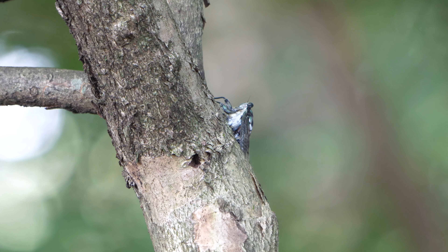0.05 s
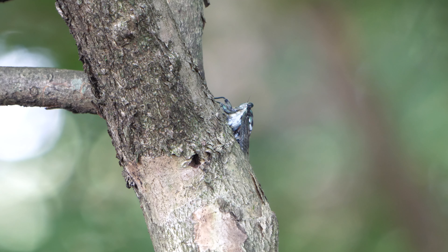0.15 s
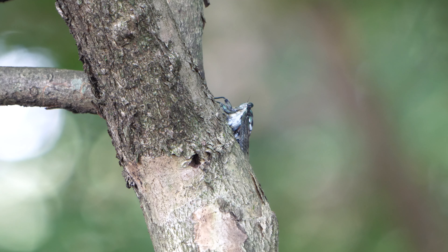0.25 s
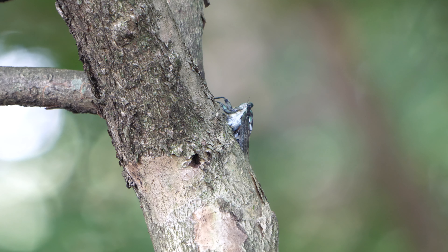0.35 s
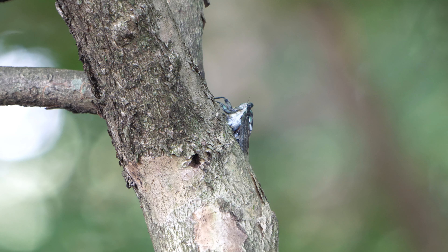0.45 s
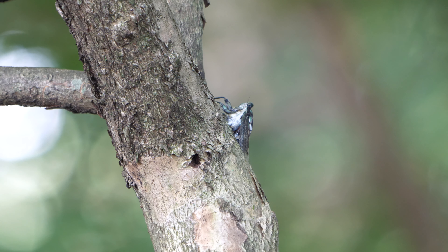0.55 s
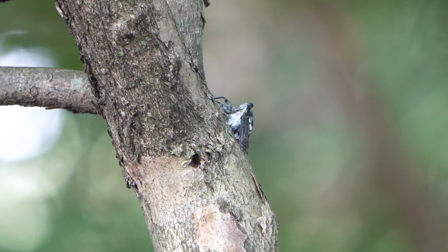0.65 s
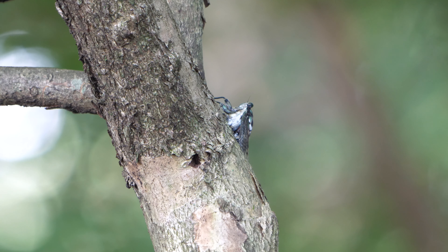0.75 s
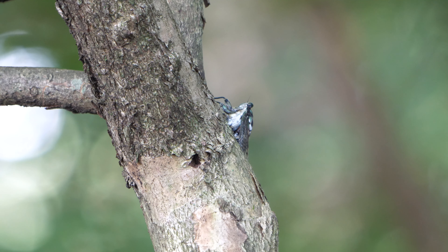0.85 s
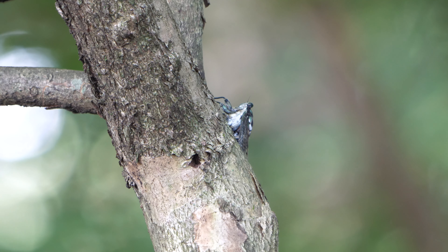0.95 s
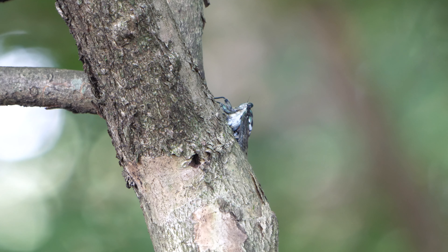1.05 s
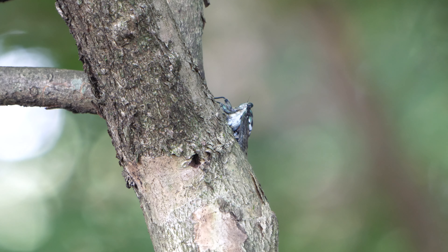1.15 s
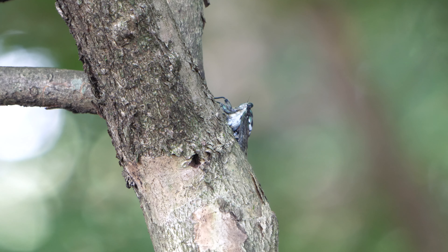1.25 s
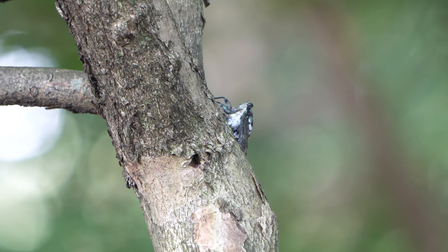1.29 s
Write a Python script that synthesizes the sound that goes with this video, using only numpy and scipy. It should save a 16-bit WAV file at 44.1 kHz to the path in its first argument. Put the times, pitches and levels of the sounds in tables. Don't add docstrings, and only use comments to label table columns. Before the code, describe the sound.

A steady wash of many distant cicadas surrounds the microphone, slightly uneven in loudness and brightness, with soft distant rumble beneath. A single near cicada enters at about two seconds: a coarse buzz climbing to a loud, tight note, dropping to thin dry clicking, then three brief whining pulses. Only the chorus remains until seven seconds, when the same buzz returns and one weaker pulse begins near the end. Open woodland, short diffuse echoes.

```python
import sys
import numpy as np
from scipy import signal
from scipy.fft import rfft, irfft, next_fast_len
from scipy.io import wavfile
from scipy.ndimage import uniform_filter1d

SR = 44100
rng = np.random.default_rng(int(sys.argv[2]) if len(sys.argv) > 2 else 0)


def ratio(d):
    e = np.asarray(d, float) / 20
    return 10 ** e


def dump_mix(stems):
    frames = np.atleast_2d(stems).T
    limited = np.clip(frames, -1, 1)
    pcm = np.round(limited * 32767).astype(np.int16)
    wavfile.write(sys.argv[1], SR, pcm)


N = 366030
PARTIALS = 85

# start t/s, end t/s, beat factor
SONG_PHRASES = [
    (2.16, 4.92, 1.0),
    (7.0, 8.31, 1.0038),
]


def singer():
    near = np.zeros(N + SR)
    for start_s, end_s, factor in SONG_PHRASES:
        sound = phrase(start_s, end_s, factor)
        at = round(start_s * SR)
        near[at:at + len(sound)] += sound
    near = near[:N]
    return near + ratio(-9) * woods(near, .25)


# belly lift t/s, held t/s, level/dB, first f/Hz, last f/Hz
BELLY_PULSES = [
    (3.39, .18, -29, 4050, 4800),
    (3.97, 0.17, -27, 4380, 4796),
    (4.505, 0.25, -26.5, 4650, 4230),
    (8.25, 0.16, -32, 4000, 4900),
]
# t/s into the phrase, f/Hz
MUSCLE_RATE = [(.04, 173.0), (.24, 175.9), (.44, 182.0), (.76, 188.7), (.84, 188.8), (1.14, 185.5),
               (1.34, 188.4), (1.92, 187.7), (2.04, 186.4)]
LONG_NOTE_RIBS = [(0, 1.0), (0.0769, 3.56), (0.1137, 0.9), (0.1522, -0.52), (0.2194, 0.88), (0.5348, -1.09),
                  (0.595, 1.56)]
PULSE_RIBS = [(0, 1.0), (0.1292, -0.71), (0.3366, 0.55), (0.3709, 0.13), (0.4411, 0.5), (0.8434, -0.33),
              (0.8715, 0.39)]
DROPPED_RIBS = [(0, 1.0), (0.4668, 0.17), (0.5725, -0.2), (0.6733, 0.14), (0.7026, 0.12), (0.7158, 0.12),
                (0.8484, -0.09)]
CLICK_RIBS = [(0, 1), (.0701, .15), (.1614, .15), (.2781, .12), (.3762, .12), (.5039, .28), (.5655, .12),
              (.7686, .25), (.8605, .2)]
# f/Hz, level/dB per Hz
CLICK_COLOUR = [(8500, -40), (9400, -22), (10000, -16), (10600, -5), (11500, -5), (12300, -2), (13200, 0),
                (13900, -4), (14600, -9), (15600, -8)]


def phrase(start_s, end_s, factor):
    pulses = [row for row in BELLY_PULSES if start_s < row[0] < end_s]
    t = np.arange(start_s, end_s, 1 / SR)
    s, *columns = np.transpose(posture(start_s, pulses))
    effort_db, belly_hz, drum_db, click_db = (np.interp(t, s, c) for c in columns)

    unsteady = .07 + uniform_filter1d(stumbles(t, pulses), 600)
    shake = evened(uniform_filter1d(rng.standard_normal(len(t)), 300))
    rate_hz = factor * np.interp(t - start_s, *np.transpose(MUSCLE_RATE))
    cycles = np.cumsum(rate_hz * (1 + (0.00087 + 0.0487 * unsteady ** 2) * shake)) / SR

    long_end_s = start_s + LONG_NOTE[-2][0] - .02
    long = np.clip((long_end_s - t) / .03, 0, 1)
    dropped = np.clip((click_db + 60) / 10, 0, 1)
    spread_rad = 1.2 * rng.standard_normal(PARTIALS)
    short = dropped * ribs(DROPPED_RIBS, cycles, spread_rad)
    short += (1 - dropped) * ribs(PULSE_RIBS, cycles, spread_rad)

    steady = np.sqrt(1 - unsteady)
    rasp = np.sqrt(unsteady) * rng.standard_normal(len(t))
    pushes = steady * (long * ribs(LONG_NOTE_RIBS, cycles, spread_rad) + (1 - long) * short) + rasp

    belly = ratio(effort_db) * evened(resonate(pushes, belly_hz, 1250))
    drum = resonate(pushes, 6200, 1500) + .09 * long * resonate(pushes, 8200, 900)
    drum = ratio(drum_db) * evened(drum)
    clicks = steady * ribs(CLICK_RIBS, cycles) + rasp
    bare = ratio(click_db) * evened(colour(clicks, lambda hz: ratio(read(CLICK_COLOUR, hz))))
    bare += ratio(effort_db - 41) * evened(resonate(pushes, 10650, 500))
    return ratio(-0.5) * colour(belly + drum, rings) + bare


# t/s into the phrase, level/dB, belly f/Hz
LONG_NOTE = [
    (0, -47, 3280),
    (.08, -25.5, 3160),
    (.15, -35, 4530),
    (.29, -30.5, 4530),
    (.44, -30.5, 4900),
    (.58, -23.5, 4980),
    (.765, -27, 4930),
    (0.817, -28, 3200),
    (.925, -30.5, 3060),
]


def posture(start_s, pulses):
    click_on_db, click_half_db, click_off_db = -47, -55.5, -73
    drum_on_db, drum_off_db, drum_low_db = -39.5, -82, -47.5
    drum_db_per_hz, tight_hz = 1, 4794
    low_hz, falling_hz, ready_hz, sag_hz = 3360, 3900, 3440, 250
    spent_db, dip_db, back_db, hush_db, fall_db, end_db = -58, -39, -31.5, -38, -4, -34.5
    swell_db_per_khz = 3
    lift_s, drop_s, settle_s, ready_s, click_full_s = .03, .05, .13, .065, .97

    drum = [drum_off_db, drum_on_db - 5] + [drum_on_db] * 6 + [drum_off_db - 6]
    clicks = [click_off_db + 9, click_half_db - 2] + [click_off_db] * 5 + [click_half_db - 3, click_half_db]
    rows = [(start_s + s, db, hz, d, c) for (s, db, hz), d, c in zip(LONG_NOTE, drum, clicks)]
    rows.append((start_s + click_full_s, LONG_NOTE[-1][1] - 5, low_hz, drum_low_db - 10, click_on_db))
    before_db = spent_db
    for at_s, held_s, db, first_hz, last_hz in pulses:
        rows.append((at_s - ready_s, before_db, ready_hz, drum_low_db, click_on_db))
        rows.append((at_s - lift_s, hush_db, ready_hz, drum_low_db, click_on_db))
        for u in np.linspace(0, 1, 3):
            hz = first_hz + u * (last_hz - first_hz)
            ring_db = np.clip(drum_on_db + drum_db_per_hz * (hz - tight_hz), drum_off_db, drum_on_db + 2)
            level_db = db + swell_db_per_khz * (hz - first_hz) / 1000
            rows.append((at_s + u * held_s, level_db, hz, ring_db, click_off_db + 12 - 6 * u))
        end_s = at_s + held_s
        if last_hz > first_hz:
            rows.append((end_s + drop_s, level_db + fall_db, falling_hz, ring_db, click_on_db - 5))
            rows.append((end_s + settle_s, dip_db, low_hz, drum_off_db, click_on_db))
        else:
            rows.append((end_s + settle_s, end_db, last_hz - sag_hz, drum_off_db, click_off_db))
        before_db = back_db
    return rows


def stumbles(t, pulses):
    stumble, tired = .7, .45
    wake_s, stumble_s, lead_s, lift_s = .13, .04, .008, .03
    out = stumble * (t < t[0] + wake_s)
    for at_s, held_s, db, first_hz, last_hz in pulses:
        out = out + stumble * (t > at_s - stumble_s - lead_s) * (t < at_s - lead_s)
        out = out + tired * (t > at_s + lift_s) * (last_hz < first_hz)
    return out


def ribs(table, cycles, spread_rad=0):
    place, size = np.transpose(table)
    partials = np.exp(-2j * np.pi * np.outer(np.arange(PARTIALS), place)) @ size
    return repeat(partials * np.exp(1j * spread_rad), cycles)


# f/Hz, width/Hz, level/dB over the rest
PATH_RINGS = [(2830, 110, 8), (3190, 100, 5), (3360, 100, 4), (3950, 110, 7), (4480, 130, 6),
              (5050, 100, 6), (5480, 110, 4), (6300, 120, 4), (6730, 120, 6), (5700, 100, 4),
              (7690, 100, 6), (8050, 110, 9), (8550, 110, 7)]


def rings(hz):
    low_cut = 1 + (2300 / (hz + 1)) ** 12
    high_cut = 1 + (hz / 8700) ** 24
    upper_shelf = 1 + 1.6 / (1 + (7200 / (hz + 1)) ** 24)
    band = 1 / np.sqrt(low_cut * high_cut * upper_shelf)
    return band * (1 + sum((ratio(db) - 1) / (1 + 2j * (hz - f) / w) for f, w, db in PATH_RINGS))


# t/s, level/dB, brightness/dB
CHORUS_SWELLS = [(0, -23.5, 0), (.25, -24.5, -2), (.6, -24.5, 0), (1.2, -25, -0.5), (1.6, -25.5, -2),
                 (2.08, -26.5, -1), (2.6, -23.5, 3), (3.25, -26.5, -4), (3.8, -25.5, 1.5),
                 (4.35, -27.5, -3.5), (4.9, -25, 2), (5.5, -25, 1), (6.1, -24.5, 0), (6.7, -25.5, -1.5),
                 (6.9, -25.5, -1), (7.5, -23.5, 2.5), (8.1, -27.5, -1.5), (8.3, -23, 3)]
# f/Hz, level/dB per Hz
CROWD_COLOUR = [(820, -86), (1400, -33.5), (1590, -73), (1870, -22), (2040, -26.5), (2200, -18.5),
                (2620, -13.5), (2840, -9), (3290, -4), (4000, -3.5), (4650, -4), (5380, -12.5), (5730, -16),
                (6630, -22), (7600, -36), (9600, -52.5), (12500, -80), (21100, -120)]
# f/Hz, level/dB per Hz
FIZZ_COLOUR = [(5000, -9), (8500, -5.5), (9470, -8), (10400, -1), (11500, -6.5), (12900, -0.5),
               (14100, -10), (15500, -6.5)]


def chorus(count=11):
    fizz_db = -56
    t = np.arange(N) / SR
    s, *columns = np.transpose(CHORUS_SWELLS)
    level_db, bright_db = (np.interp(t, s, c) for c in columns)
    buzz, ticks = np.zeros((2, N))
    for beat_hz in np.linspace(166, 200, count):
        swing = np.tanh(wander(2.5, N))
        drift, tremble = .04 * wander(1.2, N), .011 * wander(12, N)
        cycles = np.cumsum(beat_hz * (1 + drift + tremble)) / SR
        voice = repeat(rng.standard_normal(PARTIALS) + 1j * rng.standard_normal(PARTIALS), cycles)
        belly = resonate(voice, 4000 + 1100 * swing, 1000)
        buzz += .25 * voice + ratio(3 * wander(9, N)) * belly
        ticks += ratio(-3.0 * swing) * voice

    flat = colour(buzz, lambda hz: 1 / (.25 + .7 / (1 + ((hz - 4000) / 1300) ** 4)))
    crowd = evened(flat + .6 * woods(flat, .2)) + .75 * rng.standard_normal(N)
    crowd = evened(colour(crowd, lambda hz: ratio(read(CROWD_COLOUR, hz))))
    upper = colour(crowd, lambda hz: 1 / (1 + (4200 / (hz + 1)) ** 8))
    tilted = ratio(-bright_db / 2) * (crowd - upper) + ratio(bright_db / 2) * upper

    fizz = 0.59 * evened(woods(ticks, 0.14)) + rng.standard_normal(N)
    fizz = ratio(fizz_db) * evened(colour(fizz, lambda hz: ratio(read(FIZZ_COLOUR, hz))))
    return ratio(level_db) * tilted + fizz


def woods(x, t60_s):
    t = np.arange(SR // 2) / SR
    tail = rng.standard_normal(len(t)) * ratio(-60 * t / t60_s) * (t > .004)
    return signal.oaconvolve(x, tail / np.linalg.norm(tail))[:len(x)]


# f/Hz, level/dB per Hz
RUMBLE_COLOUR = [(18, -55), (36, -13), (108, 0), (196, -4), (289, -3), (336, -8.5), (425, -4.5),
                 (558, -9.5), (974, -11.5), (1110, -14), (1540, -13.5), (1700, -6.5), (2210, -31),
                 (3740, -120)]
# f/Hz, width/Hz, level/dB
HUM_LINES = [(135, 16, -57.5), (200.3, 12.7, -56), (279.6, 7.2, -64.5), (428, 7.2, -69.5)]
# t/s, length t/s, f/Hz, level/dB
SQUEAK = (.23, .07, 1200, -54)


def town():
    rumble_db = -49.5 + 0.84 * wander(7.5, N)
    noise = rng.standard_normal(N)
    out = ratio(rumble_db) * evened(colour(noise, lambda hz: ratio(read(RUMBLE_COLOUR, hz))))
    for hz, width_hz, db in HUM_LINES:
        out += ratio(db) * evened(resonate(rng.standard_normal(N), hz, width_hz))
    at_s, length_s, hz, db = SQUEAK
    t = np.arange(N) / SR - at_s
    swell = np.sin(np.pi * np.clip(t / length_s, 0, 1))
    return out + ratio(db) * swell * np.sin(2 * np.pi * hz * t)


def evened(x):
    return x / np.sqrt(np.mean(x ** 2) + 1e-20)


def read(points, hz):
    f, value = np.transpose(points)
    return np.interp(np.log(hz + 1), np.log(f + 1), value)


def colour(x, gain_of_hz):
    size = next_fast_len(len(x))
    gain = gain_of_hz(np.fft.rfftfreq(size, 1 / SR))
    return irfft(rfft(x, size) * gain, size)[:len(x)]


def resonate(x, hz, width_hz):
    turn = np.exp(2j * np.pi * np.cumsum(hz * np.ones(len(x))) / SR)
    r = np.exp(-np.pi * width_hz / SR)
    smooth = signal.lfilter([(1 - r) ** 2], [1, -2 * r, r * r], x / turn)
    return 2 * (turn * smooth).real


def wander(per_s, size):
    step_hz = 40
    steps = rng.standard_normal(int(size / SR * step_hz) + 3)
    f = np.fft.rfftfreq(len(steps), 1 / step_hz)
    slow = evened(irfft(rfft(steps) * (f > 0) / (1 + (f / per_s) ** 4), len(steps)))
    return np.interp(np.arange(size) * step_hz / SR, np.arange(len(steps)), slow)


def repeat(partials, cycles):
    points = 16384
    shape = evened(irfft(partials, points))
    return np.interp(cycles % 1, np.arange(points) / points, shape, period=1)


def scene():
    return (singer() + chorus() + town())[None]


def roll_off(x):
    return signal.sosfilt(signal.butter(12, 15640, fs=SR, output="sos"), x)


def record(dry):
    return roll_off(dry)


dry = scene()
out = record(dry)
dump_mix(out)
```